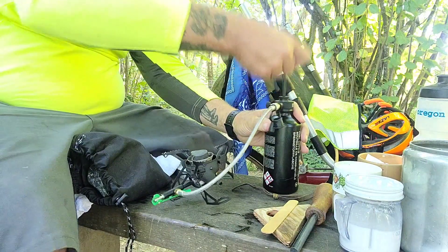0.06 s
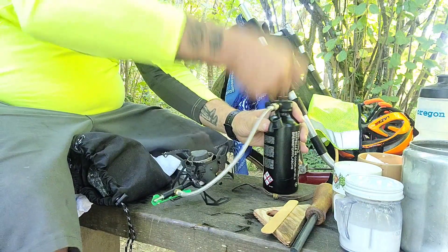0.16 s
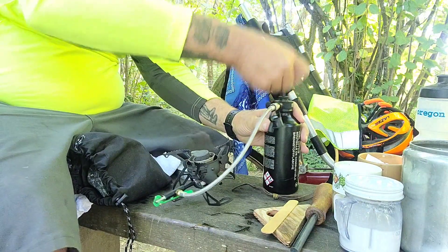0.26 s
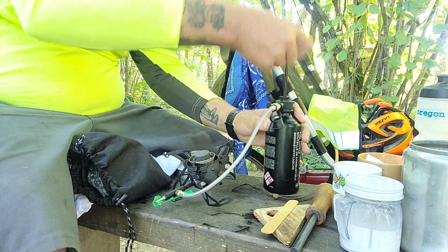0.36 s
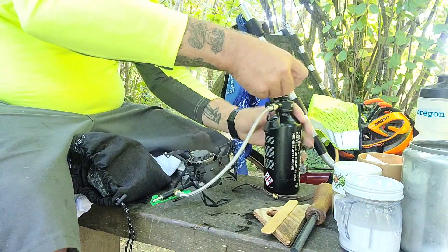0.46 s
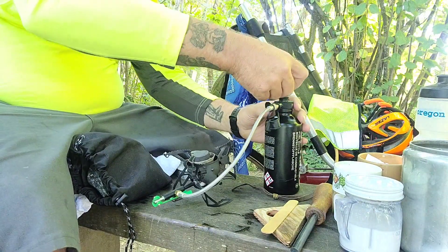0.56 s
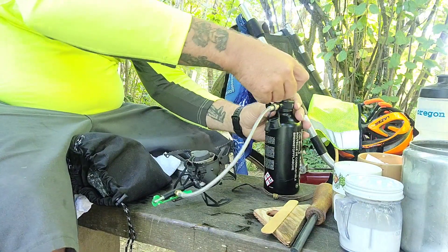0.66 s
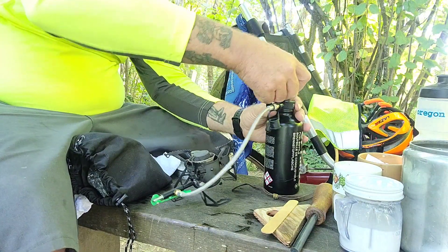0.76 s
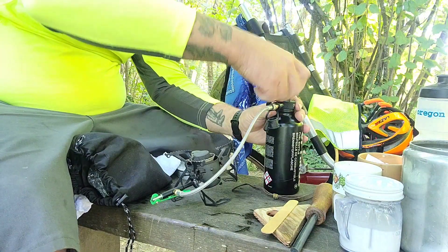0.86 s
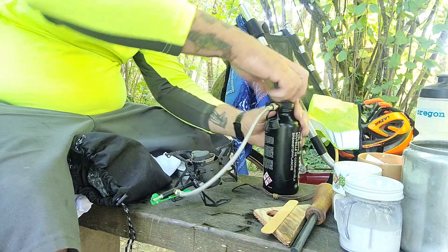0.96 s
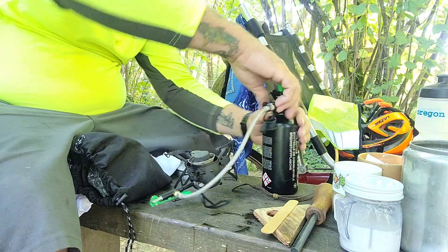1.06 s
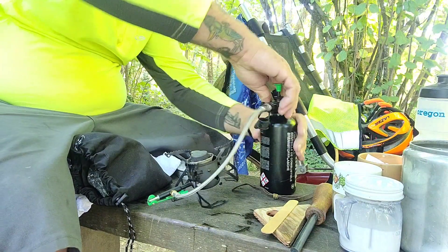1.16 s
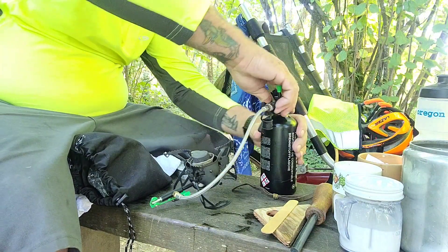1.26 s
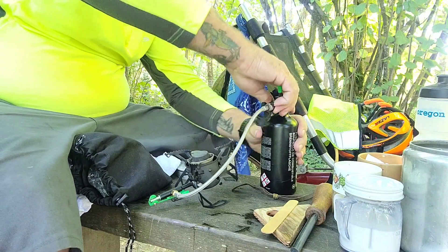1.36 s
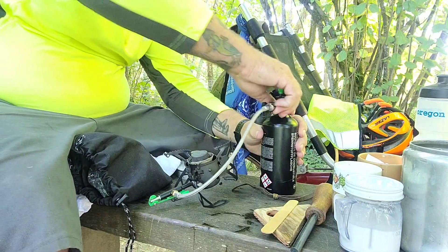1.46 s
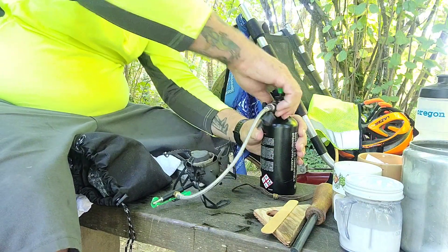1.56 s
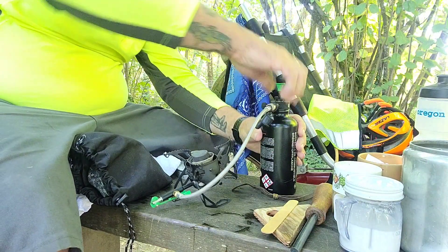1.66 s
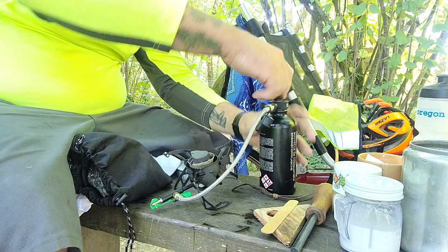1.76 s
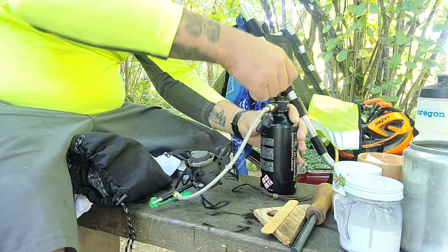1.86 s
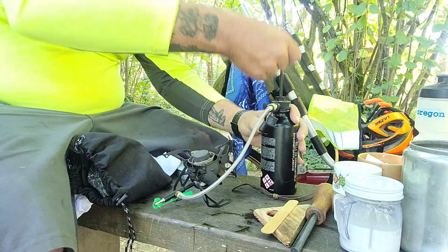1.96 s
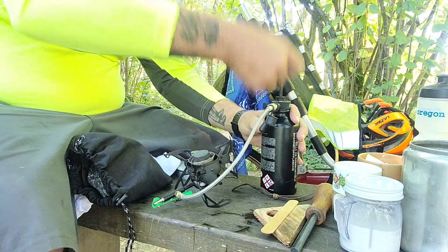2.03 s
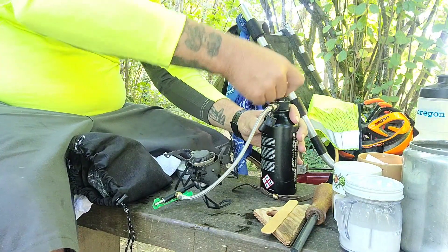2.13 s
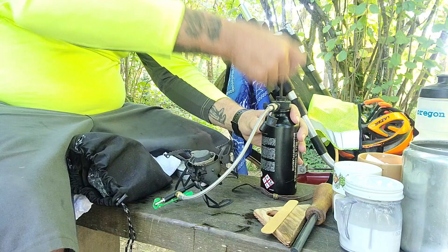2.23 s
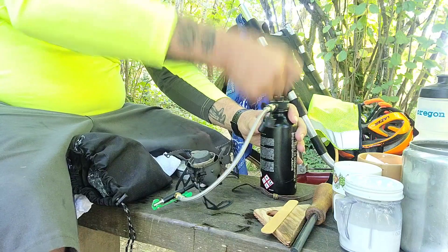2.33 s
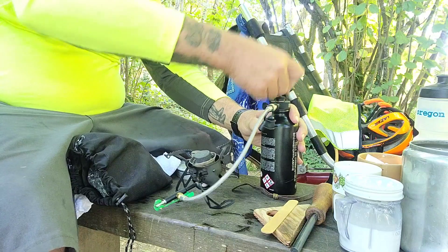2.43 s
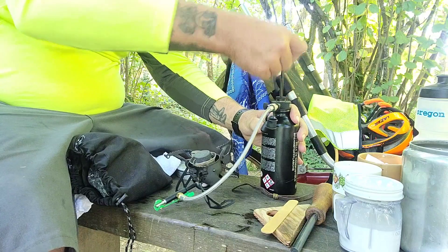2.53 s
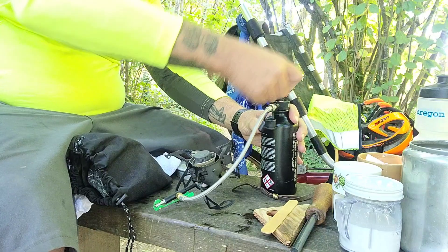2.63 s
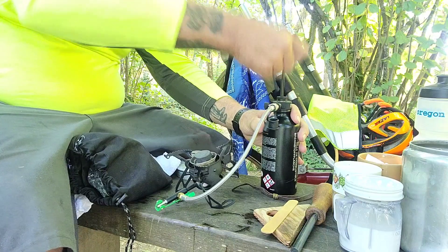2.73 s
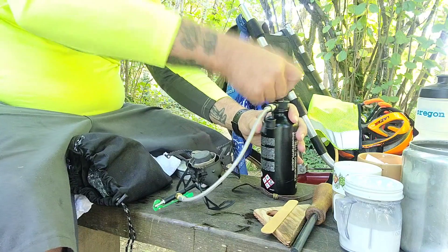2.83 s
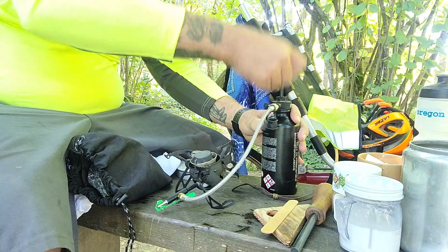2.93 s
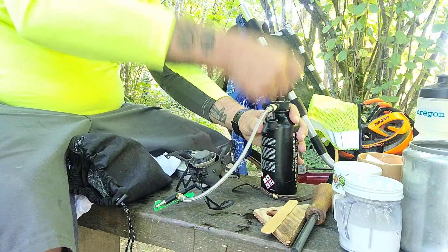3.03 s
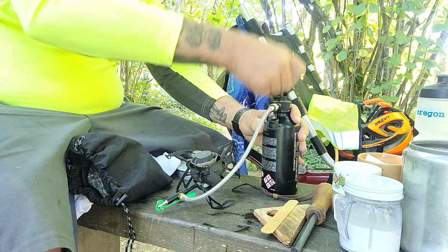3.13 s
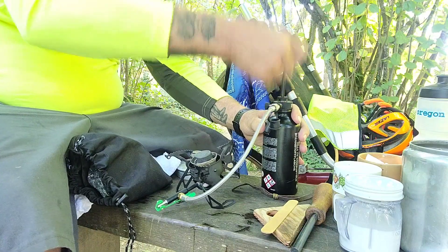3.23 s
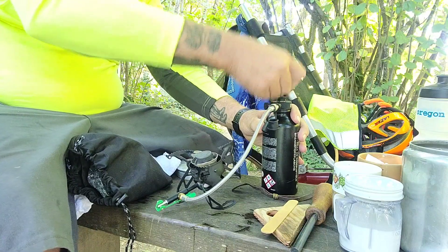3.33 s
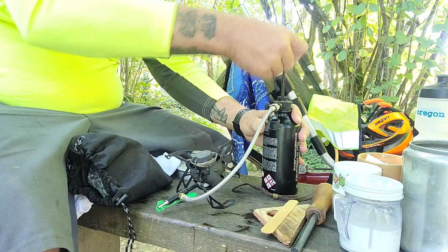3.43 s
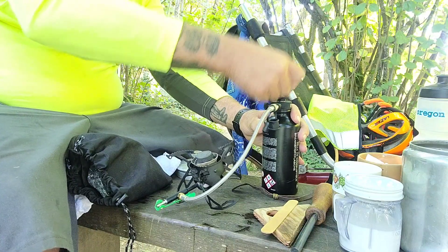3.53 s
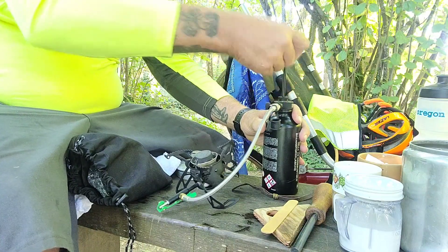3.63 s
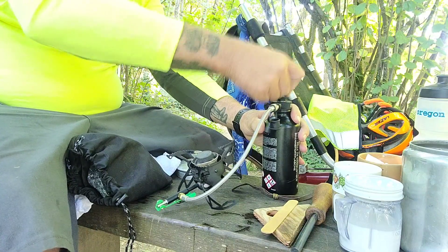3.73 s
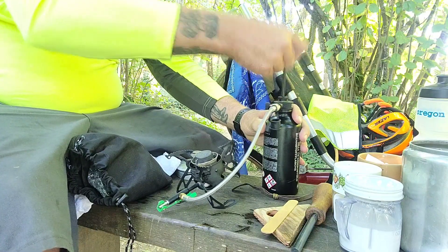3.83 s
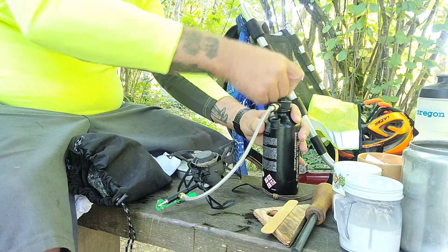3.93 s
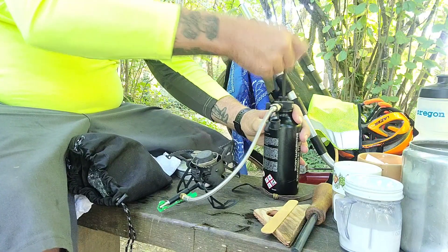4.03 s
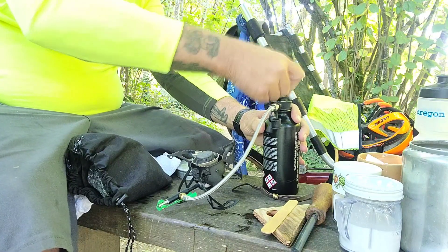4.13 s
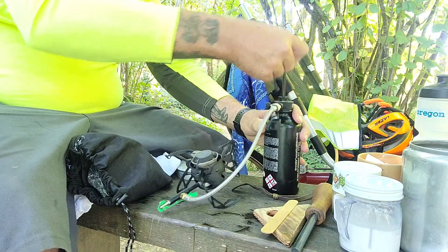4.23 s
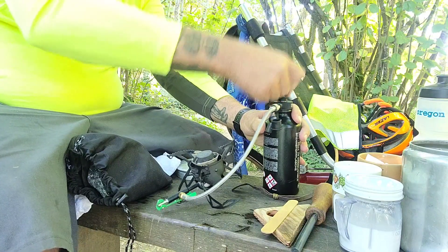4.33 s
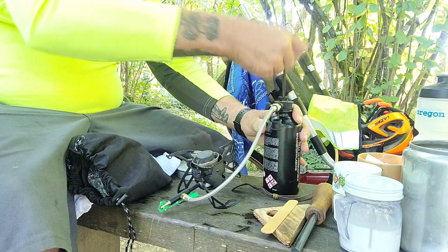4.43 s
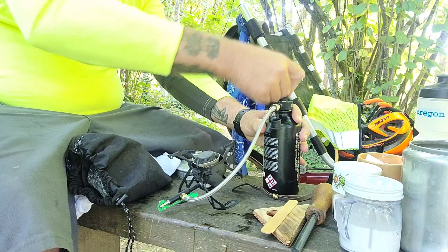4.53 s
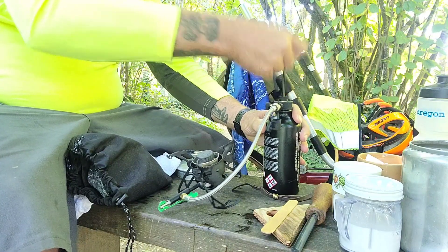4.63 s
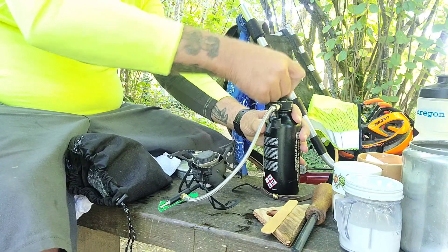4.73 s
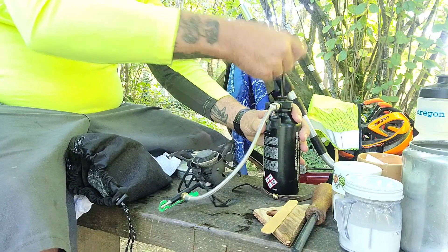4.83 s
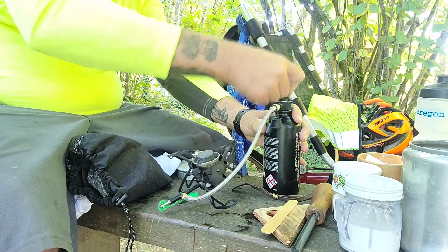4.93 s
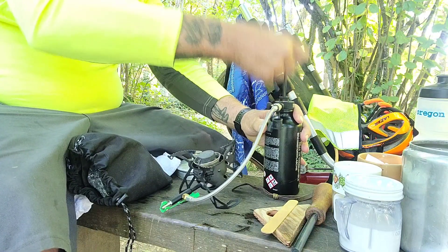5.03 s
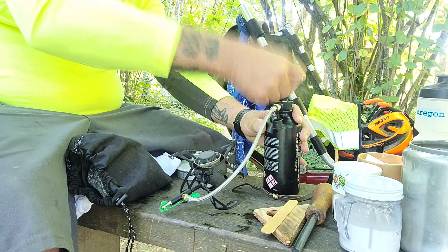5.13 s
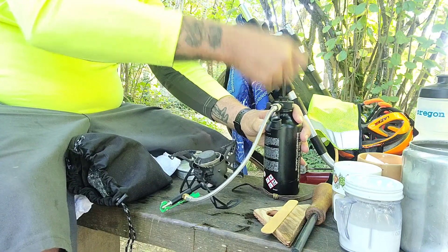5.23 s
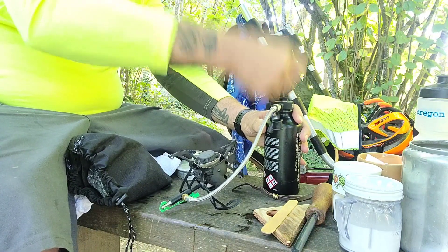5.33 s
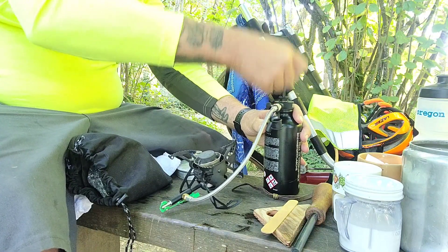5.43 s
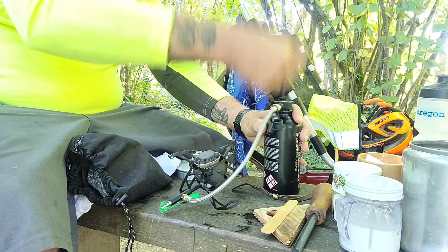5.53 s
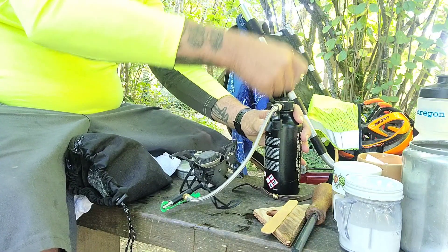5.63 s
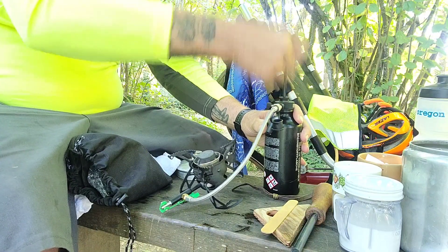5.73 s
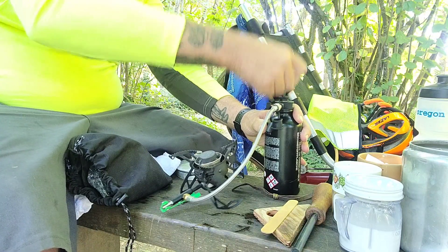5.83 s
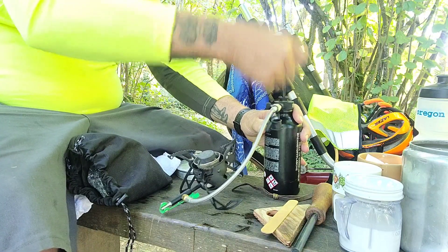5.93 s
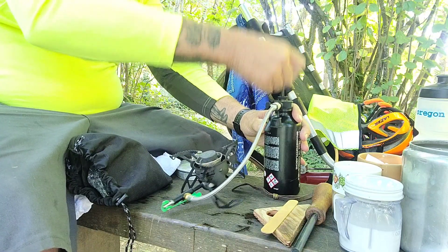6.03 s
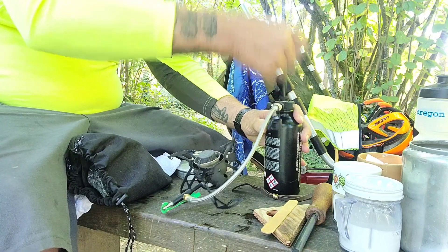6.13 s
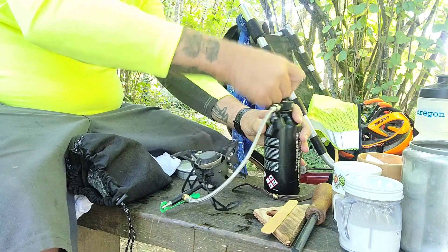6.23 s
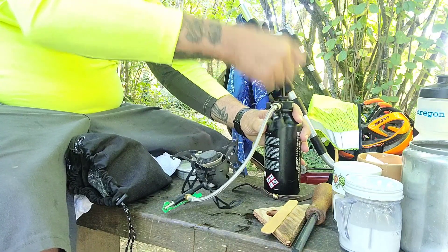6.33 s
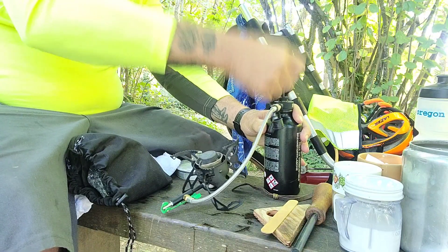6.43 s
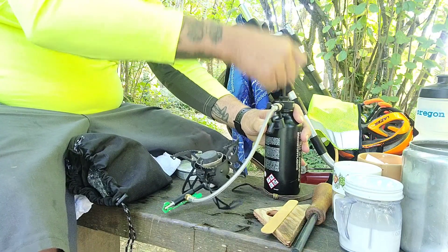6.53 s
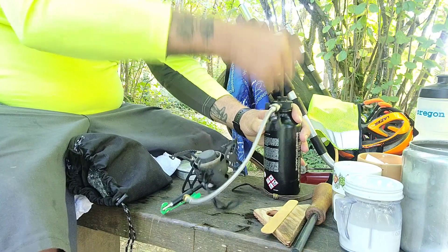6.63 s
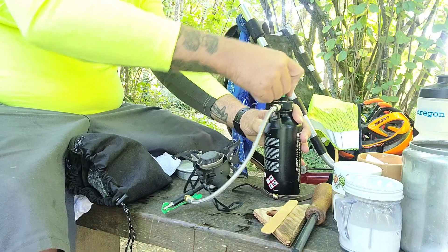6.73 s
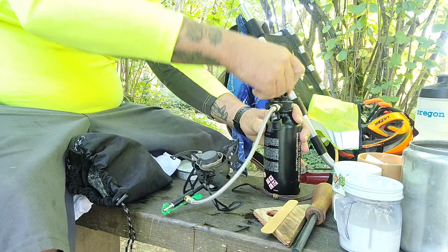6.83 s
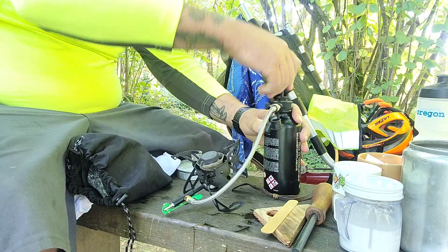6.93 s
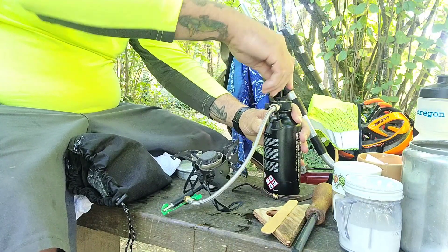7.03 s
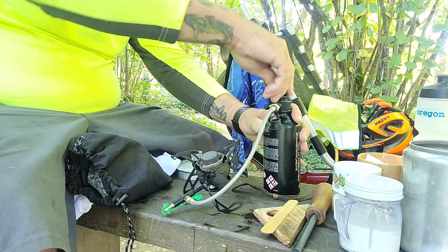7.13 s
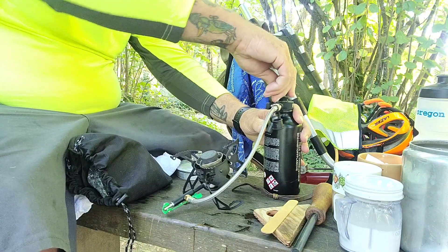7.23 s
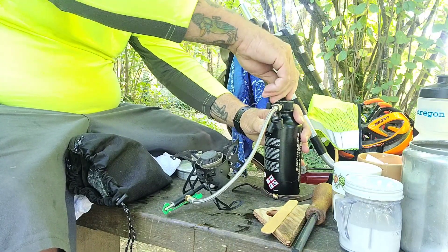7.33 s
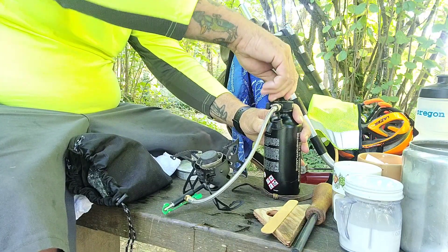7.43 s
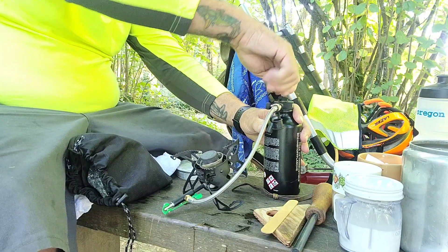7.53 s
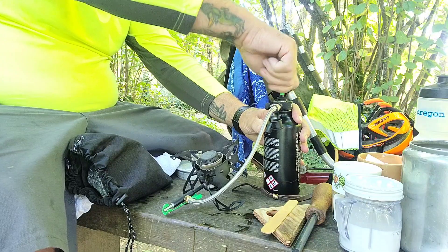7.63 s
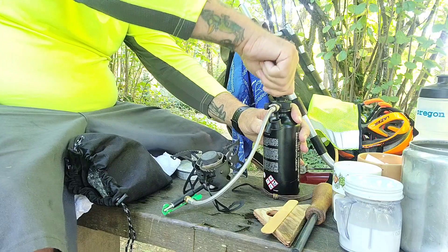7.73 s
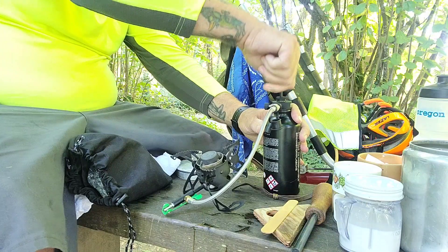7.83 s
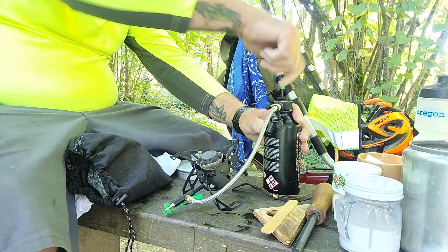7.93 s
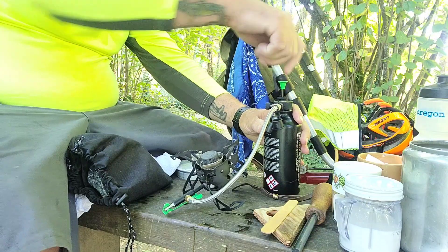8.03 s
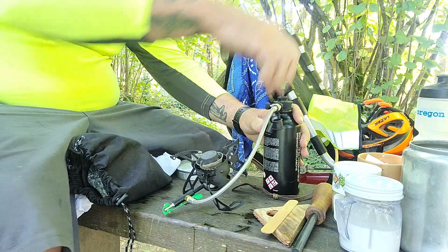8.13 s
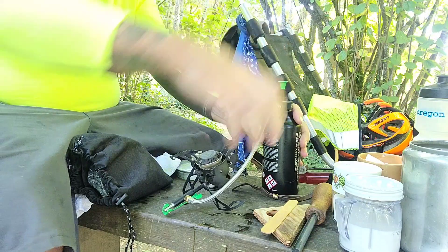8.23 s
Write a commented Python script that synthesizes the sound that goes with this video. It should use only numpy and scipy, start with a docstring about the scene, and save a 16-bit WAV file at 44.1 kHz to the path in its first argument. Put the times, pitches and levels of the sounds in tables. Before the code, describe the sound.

Hollow pops, sharp plunger clacks and small liquid bubbles repeat about five times a second as a bottle is pumped by hand, close up outdoors.

```python
"""Hollow pops and clacks come first, in quick runs: a small hand pump fills a camping stove's fuel bottle.
Each push pops the check valve open (a fluttering note) and blows bubbles into the fuel (wavering notes).
The plunger clacks against its stop on most pushes (noise bursts and ringing modes), and the fuel glugs.
The sliding plunger hisses (noise in wisps) and fingers tick on the fittings (snaps and short rings).
Behind it are short echoes from around the wooden table, and a faint low outdoor hum (noise and a drone)."""
import sys
import numpy as np
from scipy import signal
from scipy.fft import rfft, irfft, next_fast_len
from scipy.io import wavfile
from scipy.ndimage import map_coordinates

SR = 44100
rng = np.random.default_rng(int(sys.argv[2]) if len(sys.argv) > 2 else 0)


def inscribe(sig):
    """Save sig as 16-bit PCM at rate SR to the path in sys.argv[1].

    A 1-D sig is mono; a 2-D sig holds one channel per row.
    Samples are clipped to [-1, 1] before scaling.
    """
    pcm = np.round(np.clip(np.atleast_2d(sig).T, -1, 1) * 32767)
    wavfile.write(sys.argv[1], SR, pcm.astype(np.int16))


N = 364856
TIME = np.arange(N) / SR
# In all tables, levels are relative: each function's own gains are added to them.
# "t60" is the time a sound takes to die away by 60 dB.


# each push opens the check valve and blows a large and a small bubble:
# (time [s], valve level [dB], valve pitch [Hz], large bubble level [dB], small bubble level [dB],
#  small bubble pitch [Hz], delay of the bubbles [s], rub of the plunger [dB])
PUSHES = [(0.0403, -21, 1193, -18.5, -26, 492, 0.0037, -53), (0.365, -15, 1153, -26, -35, 591, 0.0047, -55),
          (2.2653, -18, 1107, -23.5, -29, 472, 0.0054, -57),
          (2.5399, -20.5, 1100, -16.5, -41, 540, .015, -56),
          (2.787, -22.5, 1097, -16, -24, 516, 0.0081, -54),
          (3.023, -20, 1138, -24, -22.5, 494, 0.0026, -51.5),
          (3.246, -18.5, 1015, -29.5, -25.5, 515, .007, -55),
          (3.473, -13, 1120, -20.5, -20.5, 536, 0.017, -53.5),
          (3.692, -15.5, 1118, -21, -23, 519, 0.013, -54),
          (3.905, -13.5, 1105, -26, -19, 511, 0.0084, -53.5),
          (4.114, -12.5, 1120, -17.5, -22.5, 560, .011, -52),
          (4.3133, -14.5, 1101, -42, -19.5, 551, 0.00082, -53.5),
          (4.5002, -15.5, 1112, -32, -25.5, 526, 0.0025, -55),
          (4.716, -13.5, 1130, -22.5, -16, 521, 0.0071, -53),
          (4.9223, -17, 1100, -28, -26.5, 475, 0.0044, -52),
          (5.117, -15, 1071, -27.5, -23, 542, .003, -53.5), (5.337, -12, 1110, -24, -21, 625, .016, -50.5),
          (5.5552, -15, 1134, -36, -16, 535, 0.01, -50.5),
          (5.7714, -16.5, 1100, -24, -17, 499, .007, -55.5),
          (5.982, -15.5, 1100, -40, -17.5, 557, .015, -53.5), (6.187, -24, 1207, -50, -37, 645, .001, -57),
          (6.3882, -14, 1148, -33, -24.5, 508, .003, -51), (6.8465, -20, 1152, -25, -17, 485, .012, -58)]


def valve(gain_db, rise, t60, flutter_hz, flutter, leak_db, leak_s):
    """Air leaks past the valve as pressure builds; then it snaps open, rings the barrel and flutters on its spring."""
    pops, leak = np.zeros(N), np.zeros(N)
    leak_shape = np.linspace(0, 1, round(leak_s * SR)) ** 2
    for s, db, hz, *_ in PUSHES:
        pop = tone(hz, rise, t60)
        this_flutter_hz = flutter_hz * rng.uniform(.7, 1.2)
        opening = 1 + flutter * np.cos(2 * np.pi * this_flutter_hz * TIME[:len(pop)])
        add(pops, s, from_db(db + gain_db) * pop * opening)
        add(leak, s - leak_s, from_db(db + leak_db) * leak_shape)
    return pops + leak * band(hz=1190, width=350)


# the fuel glugs as the plunger comes back: (time [s], level [dB])
GLUGS = [(0.6132, -34), (3.6188, -41.5), (3.8388, -37.5), (4.036, -43.5), (4.2469, -33), (4.4558, -22.5),
         (4.6548, -28), (4.8623, -28.5), (5.0768, -19.5), (5.2698, -34.5), (5.4794, -32), (5.703, -37),
         (5.9295, -31), (6.148, -29), (6.3636, -19.5), (6.573, -43)]
GLUG_HZ, GLUG_SCATTER, GLUG_T60_S = 400, 0.12, 0.0096  # the scatter is a share of the pitch
# fuel laps in the bottle while the pump rests: (time [s], level [dB])
LAPS = [(0.6121, -35.5), (0.713, -43), (1.178, -47), (1.378, -45.5), (1.451, -48), (2.044, -46.5)]
LAP_HZ, LAP_T60_S = 281, 0.048
# the large bubble rings higher as pressure builds in the bottle, and settles after a few pushes
SLACK_HZ, PRESSURISED_HZ, PRESSURE_PUSHES = 217, 322, 3.4
LARGE_T60_S, SMALL_T60_S = .058, .052
# every pop also sheds a few short-lived bubbles of any size, weaker than itself
SHED_DB, SHED_LOW_HZ, SHED_HIGH_HZ, SHED_WITHIN_S, SHED_T60_S = -14, 190, 810, 0.016, 0.024


def air_pockets(count=3):
    """The bubbles of each push, and one for each glug or lap, as (time [s], level [dB], pitch [Hz], t60 [s])."""
    pockets = []
    for done, (s, valve_db, _, large_db, small_db, small_hz, delay, _) in enumerate(PUSHES):
        slackness = np.exp(-done / PRESSURE_PUSHES)
        large_hz = PRESSURISED_HZ + (SLACK_HZ - PRESSURISED_HZ) * slackness
        pockets.append((s + delay, large_db, large_hz, LARGE_T60_S))
        pockets.append((s + delay, small_db, small_hz, SMALL_T60_S))
        for when, pitch in rng.random((count, 2)):
            shed_hz = SHED_LOW_HZ * (SHED_HIGH_HZ / SHED_LOW_HZ) ** pitch
            pockets.append((s + when * SHED_WITHIN_S, valve_db + SHED_DB, shed_hz, SHED_T60_S))
    for s, db in GLUGS:
        pockets.append((s, db, GLUG_HZ * rng.normal(1, GLUG_SCATTER), GLUG_T60_S))
    return pockets + [(s, db, LAP_HZ, LAP_T60_S) for s, db in LAPS]


def bubbles(gain_db, rise, wobble, slosh_db):
    """Each pocket of air rings at the pitch of its size, wavering as it changes shape, and stirs the fuel."""
    rings, stir = np.zeros(N), np.zeros(N)
    for s, db, hz, t60 in air_pockets():
        shape = swell(rise, t60)
        wavering = np.sin(2 * np.pi * (60 * TIME[:len(shape)] + rng.random()))
        pitch = hz * (1 + wobble * wavering)
        add(rings, s, from_db(db + gain_db) * shape * np.sin(2 * np.pi * np.cumsum(pitch) / SR))
        add(stir, s, from_db(db + slosh_db) * swell(0.0022, 0.088))
    return rings + stir * band(hz=492, width=800)


# the plunger hits its stop:
# (time [s], level [dB], hollow ring relative to level [dB], crack relative to level [dB])
CLACKS = [(0.061, -9, 3, -9.5), (0.3807, -11.5, 1.5, -6.5), (2.2962, -27, -2.5, -9),
          (2.555, -7.5, -6, -10.5), (2.8034, -10.5, -3.5, -8.5), (3.0448, -19.5, -10, -2),
          (3.2622, -19, -4, -5.5), (3.486, -14.5, 0.5, -1.5), (3.711, -19.5, -1, -6.5),
          (3.9258, -21, 2, -6.5), (4.133, -16.5, -1, -5.5), (4.5127, -16, -0.8, -6.5),
          (4.734, -18.5, 1, -4), (5.1291, -14, -1.8, -7), (5.3533, -11.5, 0, -6.5),
          (5.577, -22.5, 4.5, -6.5), (5.788, -16.5, -0.5, -6.5), (5.999, -18, -3.5, -6),
          (6.399, -7.5, -3, -10), (6.861, -14.5, -3, -9)]
# notes of the hollow pump barrel: (pitch [Hz], level [dB], t60 [s])
HOLLOW_MODES = [(1181, 3.5, 0.042), (1232.5, -7, 0.06)]
# notes of the pump and bottle wall: (pitch [Hz], level [dB], t60 [s])
WALL_MODES = [(1900, -4.5, 0.022), (2160, -10, 0.017), (2322.5, -1.5, 0.04), (2624, -3.5, .022),
              (2856, -5.5, 0.02), (3126, -5.5, 0.011), (3280, -9, 0.046), (3983, -22.5, .02),
              (5000, -29, .02), (6080, -12.5, .018), (6700, -25.5, .02), (7370, -24.5, .02)]
# notes of the table top when the bottle bumps it: (pitch [Hz], level [dB], t60 [s])
TABLE_MODES = [(124, -21.5, 0.23), (211, -17, 0.11)]
# colour of the gritty crack: (frequency [Hz], level [dB])
CRACK = [(150, -5), (700, 11), (1550, 0), (3000, 8.5), (4500, -2), (6200, -1), (7300, -3.5), (8400, -26.5),
         (10300, -13), (13500, -14), (16000, -15.5)]
# colour of the snap, for clacks and ticks alike: (frequency [Hz], level [dB])
SNAP = [(300, -26.5), (2500, -9), (6200, -4), (7400, -3.5), (8600, -16.5), (10500, -6), (13500, -1),
        (16000, -6)]
# the hand around the bottle keeps its wall from ringing longer than this
GRIP_T60_S = .025


def struck_wall(spread_db):
    """The wall's notes after one blow: each blow lands differently, and each note is uneven on the two sides."""
    wall = 0
    for hz, mode_db, t60 in WALL_MODES:
        gain = from_db(mode_db + rng.normal(0, spread_db, (2, 1))) * rng.choice([-1, 1])
        phase = rng.normal(0, 0.38, (2, 1))
        wall = wall + gain * tone(hz * rng.normal(1, 0.018), 0.0021, min(t60, GRIP_T60_S), phase)
    return wall


def knocks(hollow_gain_db, wall_db, crack_gain_db, crack_t60, snap_db, snap_t60, spread_db, bounce_db, thump_db):
    """The plunger's stop: a snap, a gritty crack, the rattling wall, the hollow barrel and a bump of the table."""
    out = np.zeros((2, N))
    # one noise shared by both sides, plus one of each side's own
    grit = rms_one(noise(CRACK, channels=1) + 1.6 * noise(CRACK))
    bright = rms_one(noise(SNAP, channels=1) + .4 * noise(SNAP))
    crack_shape = from_db(crack_gain_db) * swell(0.00056, crack_t60)
    snap_shape = from_db(snap_db) * swell(0.00091, snap_t60)
    thump = sum(from_db(mode_db + thump_db) * tone(hz, 0.0021, t60) for hz, mode_db, t60 in TABLE_MODES)
    for s, db, hollow_db, crack_db in CLACKS:
        bounces = rattle(bounce_db, gap_s=0.0013)
        wall = signal.fftconvolve(struck_wall(spread_db), bounces, axes=1)[:, :len(thump)]
        hollow = sum(from_db(mode_db) * tone(hz * rng.normal(1, .015), 0.0012, t60)
                     for hz, mode_db, t60 in HOLLOW_MODES)
        now = slice(round(s * SR), round(s * SR) + len(thump))
        crack = grit[:, now] * crack_shape + bright[:, now] * snap_shape
        blow = from_db(wall_db) * wall + from_db(hollow_db + hollow_gain_db) * hollow
        blow = blow + from_db(crack_db) * crack + thump
        add(out, s, from_db(db) * blow)
    return out


def rattle(bounce_db, gap_s, count=4):
    """A blow and its quick, fading rebounds, as a train of clicks of unit energy."""
    at = np.round(np.cumsum(rng.uniform(.4, 1.6, count)) * gap_s * SR).astype(int)
    clicks = np.zeros(at[-1] + 1)
    clicks[0] = 1
    clicks[at] += from_db(bounce_db * np.arange(1, count + 1)) * rng.choice([-1, 1], count)
    return clicks[None] / np.sqrt(np.sum(clicks ** 2))


# extra slides, as the plunger is eased along or turned: (middle [s], half length [s], level [dB])
SLIDES = [(.25, .05, -57), (0.561, .08, -50), (1.174, 0.14, -71), (1.96, 0.025, -62), (2.125, 0.04, -54.5),
          (2.28, 0.037, -53.5), (4.357, 0.036, -57.5), (4.974, .03, -58), (6.565, 0.078, -55),
          (6.747, .04, -59.5), (7.097, 0.23, -74), (8.21, .08, -73.5)]
# colour of the plunger's hiss: (frequency [Hz], level [dB])
HISS = [(300, 3), (800, -7), (1170, 0), (1550, -11), (2300, 1), (3050, 2), (4200, -9.5), (5900, -3.5),
        (7200, -16), (8600, -23), (10500, -18), (13000, -12), (16000, -14)]
# the rub swells on the pull and on the push;
# middles lie before the valve opens, in shares of the stroke, as do the widths
PULL_LEAD, PULL_WIDTH, PULL_DB = 0.44, 0.21, -1
PUSH_LEAD, PUSH_WIDTH, PUSH_DB = .06, .14, 3.5
LONGEST_STROKE_S = .35


def plunger(gain_db, rush_db, rush_s):
    """The cup rubs on pull and push and rests as the hand turns; squeezed air rushes just before each stop."""
    speed = sum(from_db(db) * glide(s, half_length) for s, half_length, db in SLIDES)
    gaps = np.diff([s for s, *_ in PUSHES], prepend=-np.inf)
    for (s, *_, db), gap in zip(PUSHES, gaps):
        stroke = min(gap, LONGEST_STROKE_S)
        speed += from_db(db + PUSH_DB) * glide(s - PUSH_LEAD * stroke, PUSH_WIDTH * stroke)
        if gap < LONGEST_STROKE_S:  # within a run, a brisk pull comes before the push
            speed += from_db(db + PULL_DB) * glide(s - PULL_LEAD * stroke, PULL_WIDTH * stroke)
    speed *= from_db(2 * drift(40) + 2 * drift(280))
    # the cup catches unevenly, so the hiss breaks into short squeaky wisps
    rub = wisps(noise(HISS, channels=1) + noise(HISS), depth_db=4.8, width_hz=430, last_s=.038)
    rush = np.zeros(N)
    for s, db, _, _ in CLACKS:
        add(rush, s - rush_s, from_db(db + rush_db) * np.linspace(0, 1, round(rush_s * SR)))
    return (from_db(gain_db) * speed + rush) * rub


def glide(middle, half_length):
    """Speed of a movement that gathers pace and stops again."""
    return np.exp(-np.minimum(((TIME - middle) / half_length) ** 2, 20))


def wisps(x, depth_db, width_hz, last_s):
    """Narrow parts of a hiss flare up and die at random, each about width_hz wide and last_s long."""
    hz, s, spectrum = signal.stft(x, SR, nperseg=512)
    chance = rng.standard_normal((256, 1024))
    places = np.meshgrid(hz / width_hz, s / last_s, indexing="ij")
    flare = map_coordinates(chance, places, order=3, mode="mirror")
    flared = spectrum * from_db(depth_db * np.minimum(flare, 2))
    return rms_one(signal.istft(flared, SR)[1][..., :N])


# light ticks of the fittings under the fingers:
# (time [s], level [dB], pitch [Hz], snap relative to level [dB])
TICKS = [(0.725, -53, 3200, -5), (0.8751, -41, 1930, -36), (1.07, -59, 1150, -25),
         (1.302, -42.5, 6200, 4.5), (1.5333, -45, 4550, -5.5), (1.6833, -56, 4830, 4.5),
         (1.9041, -49, 2330, -3), (2.9503, -54, 2500, -12), (5.4905, -42.5, 4900, 2.5),
         (6.2455, -50, 2500, -3), (6.3249, -42, 3800, 2.5), (6.372, -41, 2630, 1), (6.633, -48, 1196, -26),
         (6.688, -54.5, 3000, 0.5), (7.02, -64, 3000, 6), (7.148, -63, 2700, -5), (7.4404, -54, 2030, -25)]


def fittings(gain_db, ring_t60, snap_t60, width_share, body_db, body_t60):
    """Small parts touch: a bright snap, a short rough ring at the part's pitch, and a knock through the pump body."""
    out = np.zeros((2, N))
    bright = rms_one(noise(SNAP, channels=1) + .5 * noise(SNAP))
    body = from_db(body_db) * (band(hz=2570, width=1000) + 0.55 * band(hz=1177, width=400))
    ring_shape, snap_shape, body_shape = swell(.0005, ring_t60), swell(0.0003, snap_t60), swell(0.00077, body_t60)
    for s, db, hz, snap_db in TICKS:
        now = slice(round(s * SR), round(s * SR) + len(ring_shape))
        ring = band(hz, hz * width_share)[now] * ring_shape + body[now] * body_shape
        snap = from_db(snap_db) * bright[:, now] * snap_shape
        add(out, s, from_db(db + gain_db) * (ring + snap))
    return out


# colour of the echoes: (frequency [Hz], level [dB])
SCATTER = [(150, -11), (400, -4), (1100, -16), (1600, -1), (2500, -5.5), (4500, 3), (7000, 0.5), (8600, -3),
           (11000, -0.5), (16000, 2.5)]


def surroundings(x, wet_db, t60, rise):
    """Table top, pots and bushes scatter a short, dense tail, different on each side."""
    shape = swell(rise, t60)
    echoes = rng.standard_normal((2, len(shape))) * shape / np.sqrt(np.sum(shape ** 2))
    return from_db(wet_db) * signal.fftconvolve(colour(x, SCATTER), echoes, axes=1)[:, :N]


# how the pump's level differs between the sides: (frequency [Hz], left minus right [dB])
BALANCE_DB = [(300, -1), (1200, -1), (2200, 0.5), (3300, 4.5), (4500, 1.5), (7000, 11.5), (9000, 6),
              (13000, 6)]
LEFT_LEAD_S = 0.00015


def microphones(x):
    """The pump reaches the left microphone first, and brighter."""
    left = colour(x[0], [(hz, db / 2) for hz, db in BALANCE_DB])
    right = colour(x[1], [(hz, -db / 2) for hz, db in BALANCE_DB])
    return np.array([left, np.roll(right, round(LEFT_LEAD_S * SR))])


# colour of the outdoor rush: (frequency [Hz], level [dB])
AIR = [(12, -34), (20, -14.5), (48, -16.5), (86, -9.5), (172, -26.5), (193, -30), (410, -34.5),
       (849, -36.5), (1150, -37.5), (1530, -46.5), (1910, -42), (6910, -58), (8650, -83), (13500, -57),
       (16000, -77.5)]
# left-right likeness of the open air: (frequency [Hz], likeness [0-1])
AIR_LIKENESS = [(30, 0.01), (100, 0.97), (500, 0.3), (1500, 0.3), (5000, 0.3)]
DRONE_HZ, DRONE_WIDTH_HZ = 83.7, 11


def open_air(air_db, drone_db, waver_db):
    """A low outdoor rush, most alike on both sides around 100 Hz, with a narrow distant drone."""
    shared = [(hz, 10 * np.log10(1 + np.clip(c, 0, .99))) for hz, c in AIR_LIKENESS]
    opposed = [(hz, 10 * np.log10(1 - np.clip(c, 0, .99))) for hz, c in AIR_LIKENESS]
    mid = colour(rng.standard_normal(N), shared)
    side = colour(rng.standard_normal(N), opposed)
    rush = rms_one(colour(np.array([mid + side, mid - side]), AIR)) * from_db(air_db + waver_db * drift(3))
    pitch = DRONE_HZ + DRONE_WIDTH_HZ / 2 * drift(27)
    drone = np.sqrt(2) * np.sin(2 * np.pi * np.cumsum(pitch) / SR)
    return rush + from_db(drone_db + 2 * drift(7.8)) * drone


def from_db(db):
    """Decibels to gain."""
    return 10 ** (np.asarray(db) / 20)


def rms_one(x):
    """Scale to rms 1."""
    return x / np.sqrt(np.mean(x ** 2) + 1e-20)


def at_hz(points, size):
    """A table over log frequency, read at the bins of a transform."""
    hz, value = np.transpose(points)
    bins_hz = np.arange(size // 2 + 1) * SR / size
    return np.interp(np.log(bins_hz + 1), np.log(hz), value)


def colour(x, spectrum):
    """Filter by a smooth spectrum in dB."""
    size = next_fast_len(x.shape[-1] + 1024, True)
    return irfft(rfft(x, size) * from_db(at_hz(spectrum, size)), size)[..., :x.shape[-1]]


def noise(spectrum, channels=2):
    """Coloured noise, unrelated between channels; rms 1."""
    return rms_one(colour(rng.standard_normal((channels, N)), spectrum))


def band(hz, width):
    """Noise in one resonance with steep skirts; rms 1."""
    edges = np.clip([hz - width / 2, hz + width / 2], 20, .45 * SR)
    return rms_one(signal.sosfilt(signal.butter(2, edges, "band", fs=SR, output="sos"), rng.standard_normal(N)))


def drift(per_s):
    """Random wander of rms 1 that heads for a new value per_s times a second."""
    return rms_one(np.interp(TIME * per_s, np.arange(4096), rng.standard_normal(4096)))


def swell(rise, t60):
    """A quarter-second envelope that rises to 1 and dies away."""
    t = TIME[:SR // 4]
    shape = (1 - np.exp(-(t / rise) ** 2)) * from_db(-60 * t / t60)
    return shape / shape.max()


def tone(hz, rise, t60, phase=0):
    """One struck resonance."""
    shape = swell(rise, t60)
    return shape * np.sin(2 * np.pi * hz * TIME[:len(shape)] + phase)


def add(out, s, sound):
    """Mix a sound in at time s."""
    start = max(round(s * SR), 0)
    part = sound[..., :N - start]
    out[..., start:start + part.shape[-1]] += part


def scene():
    """The pump, its short echoes and the open air."""
    pops = valve(gain_db=1.5, rise=0.0012, t60=0.038, flutter_hz=200.9, flutter=0.39,
                 leak_db=-22.5, leak_s=0.0096)
    inside = pops + bubbles(gain_db=2.0, rise=0.0016, wobble=0.04, slosh_db=-12)
    # the bottle muffles what happens inside it
    fuel = signal.sosfilt(signal.butter(4, 1750, fs=SR, output="sos"), inside)
    clacks = knocks(hollow_gain_db=-4.0, wall_db=-2.0, crack_gain_db=5.0, crack_t60=.022, snap_db=-6.5,
                    snap_t60=0.0044, spread_db=4.0, bounce_db=-5, thump_db=-5.0)
    hiss = plunger(gain_db=2.0, rush_db=-21, rush_s=0.025)
    ticks = fittings(gain_db=1.0, ring_t60=0.037, snap_t60=0.029, width_share=.15, body_db=0, body_t60=0.047)
    hard = clacks + ticks
    echoes = surroundings(hard, wet_db=-9.5, t60=0.12, rise=0.0023)
    echoes += surroundings(np.array([fuel, fuel]), wet_db=-14.5, t60=0.045, rise=0.0023)
    pump = microphones(hard + fuel + hiss + echoes)
    return pump + open_air(air_db=-52.5, drone_db=-55.5, waver_db=0.0)


def record(dry):
    """The highest peaks are rounded and the top is cut above 16.1 kHz."""
    return signal.sosfilt(signal.ellip(10, .1, 80, 16100, fs=SR, output="sos"), np.tanh(dry))


dry = scene()
out = record(dry)
inscribe(out)
```